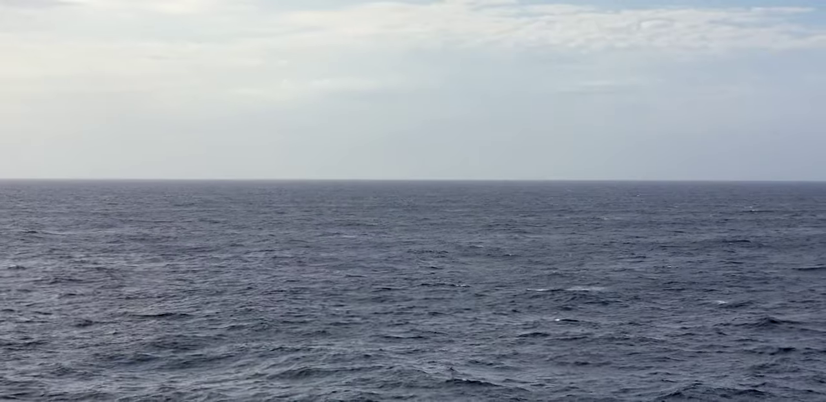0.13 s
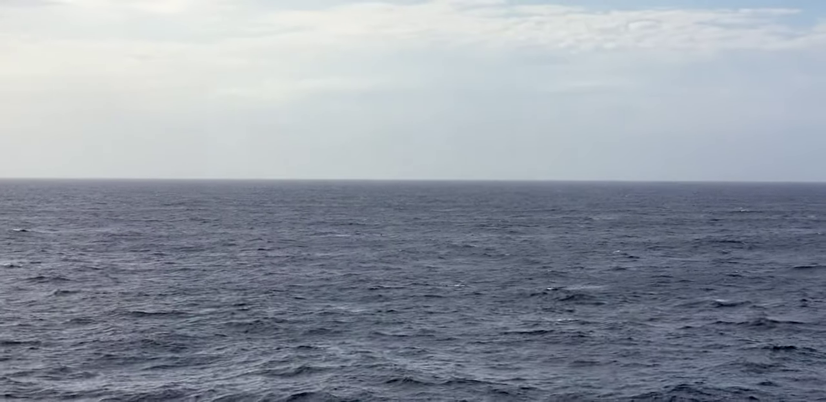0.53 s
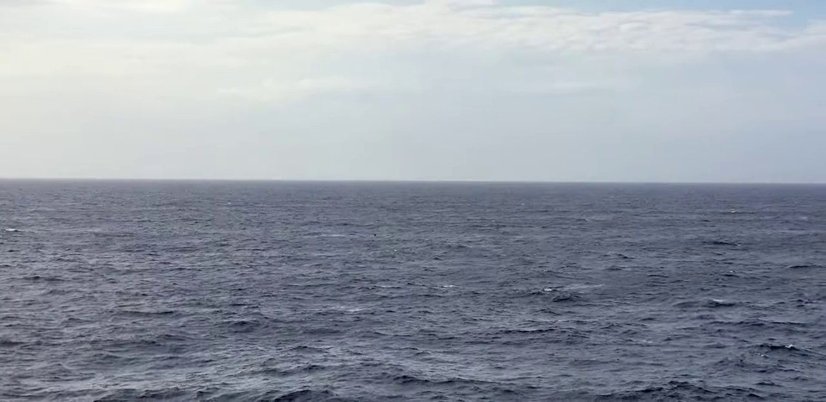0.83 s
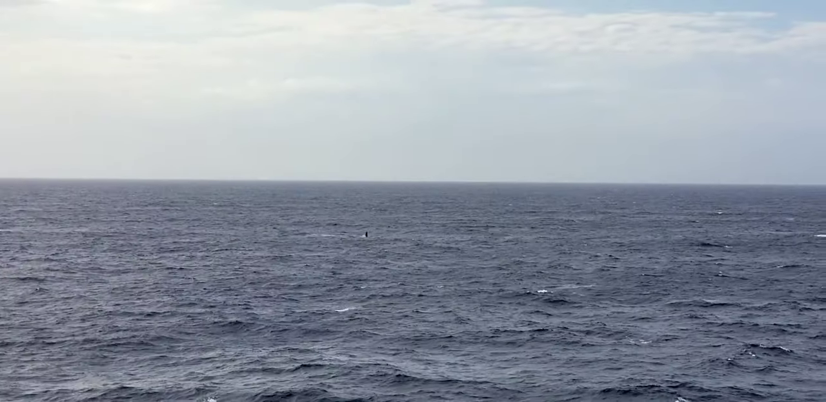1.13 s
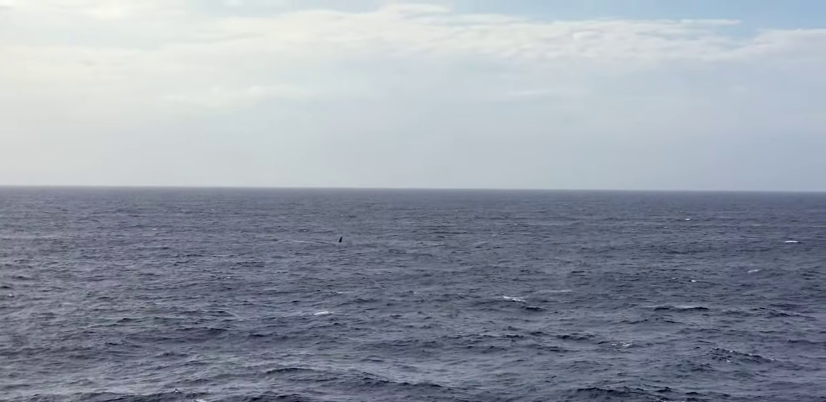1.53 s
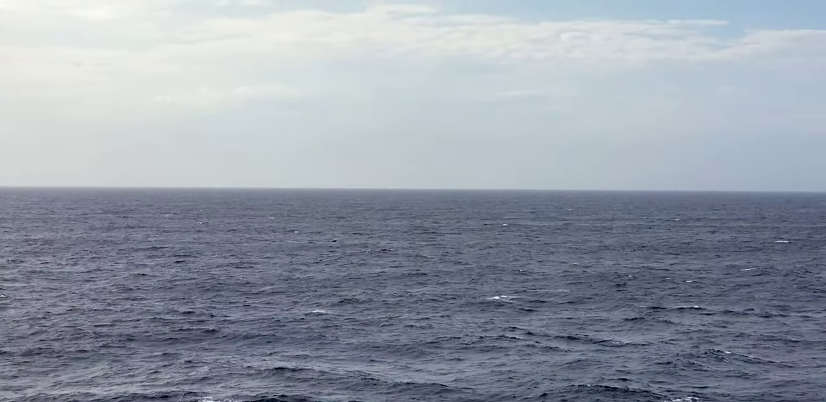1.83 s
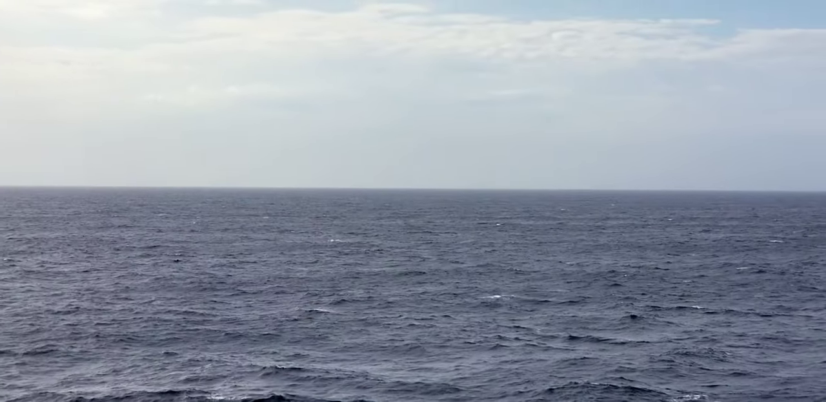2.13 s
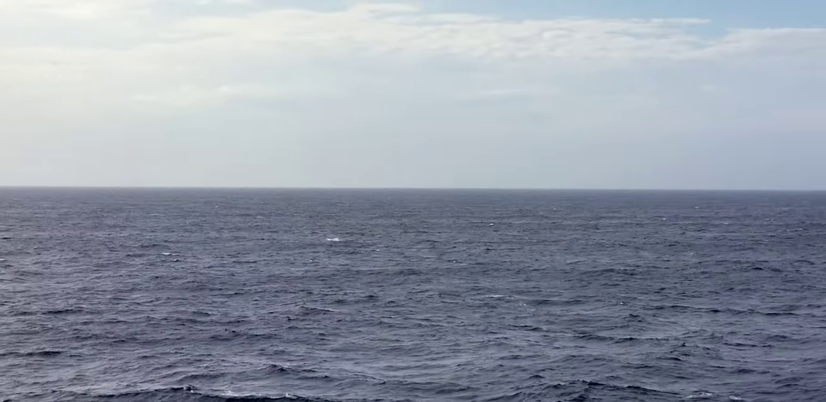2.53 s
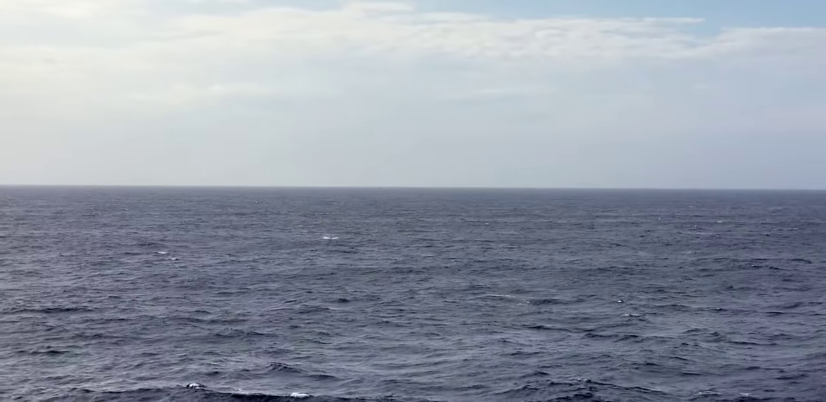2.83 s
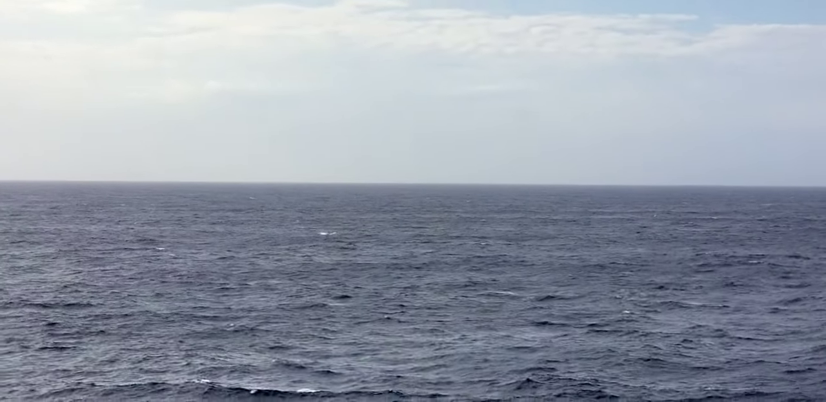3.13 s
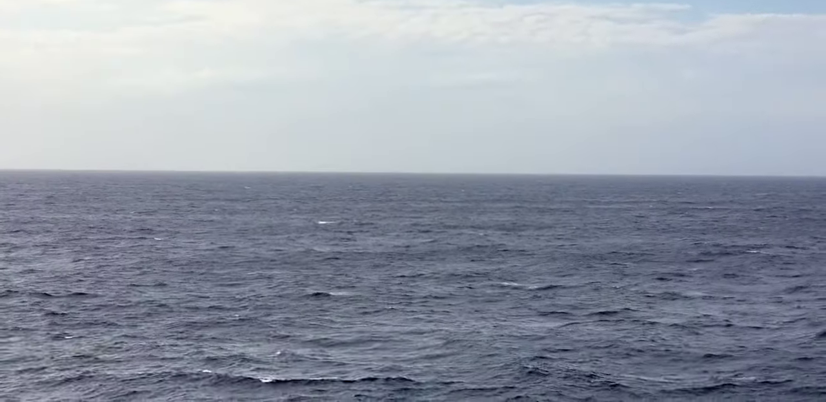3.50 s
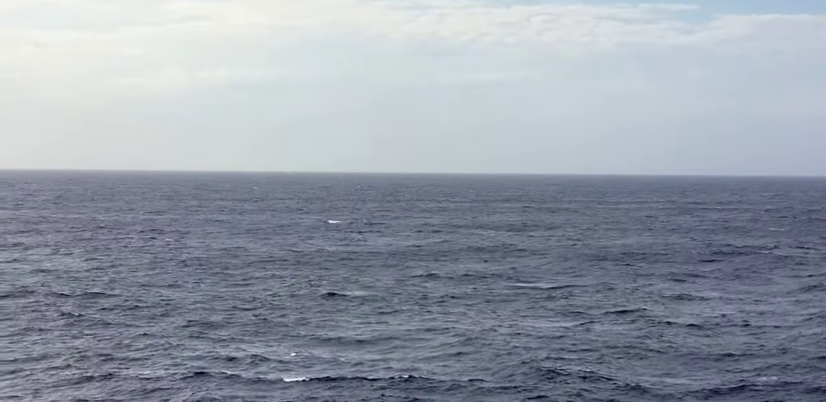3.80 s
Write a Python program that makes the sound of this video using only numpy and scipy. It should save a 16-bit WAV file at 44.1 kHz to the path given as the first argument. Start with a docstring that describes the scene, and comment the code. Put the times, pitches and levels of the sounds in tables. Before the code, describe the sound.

After a tiny silence, wind noise cuts in abruptly at 0.08 seconds: rolling rumble, raspy flutter and soft pops on the exposed right, dull thumps on both sides. It dips near 1.1, swells around 1.5-1.7, then breaks into weaker separate puffs from about 3 seconds. The sheltered left holds a low, wavering ship drone. Choppy water washes along the hull with brief foam fizz and faint steady hiss.

```python
"""Open, choppy sea heard from the deck of a moving ship on a windy day.
After a short silence all cuts in: gusts of random pressure spikes flutter at the right microphone port, over
noise shaped into a rolling rumble and rasp, with pops; thumps reach both ports. The sheltered left hears mostly
the ship's low drone (noise with narrow tones). Surging noise is water along the hull, grainy bursts are foam,
faint steady noise is hiss. The wind dips after one second, rises again, then eases into separate puffs."""
import sys
import numpy as np
from scipy import signal
from scipy.fft import rfft, irfft
from scipy.io import wavfile
from scipy.ndimage import uniform_filter1d

SR = 44100
rng = np.random.default_rng(int(sys.argv[2]) if len(sys.argv) > 2 else 0)


def int16_out(signal):
    """Quantize to a 16-bit WAV file."""
    q = np.round(np.clip(np.atleast_2d(signal).T, -1, 1) * 32767)
    wavfile.write(sys.argv[1], SR, q.astype(np.int16))


N = 174636
TIME, BINS = np.arange(N) / SR, np.fft.rfftfreq(N, 1 / SR)  # seconds, Hz
START_S, EDGE_HZ = .078, 14600  # silence before this time, little sound above this pitch

# slow rise and fall of the wind: [start_s, relative level_db]
GUSTS = [(.08, 1), (.23, 3), (.38, 2), (.58, 0.14), (.72, 0), (.94, 0), (1.06, -4), (1.25, -1.6),
         (1.38, -.5), (1.46, 2), (1.65, 3), (1.72, -.5), (1.9, 0.9), (2.04, 0.6), (2.15, 2), (2.22, -2.5),
         (2.34, 0.4), (2.48, 1), (2.66, 0.3), (2.8, -1.6), (3.02, -3), (3.3, -3.8), (3.52, -3),
         (3.66, -5.5), (3.95, -6.5)]
# single buffets and lulls of the wind: [centre_s, length_s, change_db]
BUFFETS = [(0.34, 0.022, -1), (0.561, 0.012, -10), (0.766, 0.024, 5), (.922, 0.013, 1.5),
           (1.067, 0.036, -3), (1.187, 0.043, 4), (1.437, 0.01, 3), (1.713, 0.038, -2.5), (1.877, 0.028, 5),
           (1.955, 0.02, -5), (2.14, 0.016, 1.5), (2.355, .02, 1.5), (2.388, .025, -2), (2.43, 0.02, 3.5),
           (2.514, 0.011, 2), (2.575, 0.012, -6.5), (2.762, 0.025, 3), (2.842, 0.017, -5),
           (2.887, 0.032, 4.5), (2.98, 0.017, -8.5), (3.06, 0.022, -15), (3.078, 0.0071, 12),
           (3.126, 0.018, -10), (3.245, 0.014, -15), (3.342, 0.029, 6), (3.386, 0.034, -2),
           (3.458, 0.025, -10), (3.522, 0.039, 4), (3.62, 0.019, 5.5), (3.633, 0.016, -10),
           (3.778, 0.028, -3.5), (3.812, 0.016, 5), (3.86, .025, -2), (3.912, .02, -5), (3.939, .015, 5)]
FLUTTER_DB, FLUTTER_HZ = 1.53, 40  # quick flutter when the gust level is 0 dB
FLUTTER_PER_DB = 0.22  # a slack wind comes in more separate puffs

# pressure spike of a middling eddy, before the gusts act on it: [pitch_hz, level_db_per_hz]
EDDY_SPECTRUM = [(20, -90), (50, -77.5), (85, -70.5), (140, -64.5), (270, -59), (480, -61.5), (750, -66),
                 (1100, -75.5), (1700, -87.5), (2600, -103), (6000, -126)]
EDDIES_PER_S, EDDY_SPREAD_DB = 950, 2.5  # number at a gust level of 0 dB, spread of heights
RATE_DOUBLES_DB = 3.5  # eddies crowd together as the wind rises
SIZE_SPREAD_OCT, OCT_PER_DB = .36, 0.0951  # stronger wind makes shorter, brighter spikes
SUCK_SHARE, SUCK_PER_DB = .25, 0.03  # share of eddies that suck instead of push; it grows with the wind
# change in the wind at the sheltered left port: [pitch_hz, change_db]
SHELTER = [(60, 2), (130, -8.5), (280, -9), (500, -16.5), (1100, -9)]

# rolling rumble of shed vortices, before the gusts: [pitch_hz, level_db_per_hz]
ROLL_SPECTRUM = [(60, -93), (140, -70.5), (210, -59.5), (280, -58.5), (360, -59.5), (480, -63.5),
                 (750, -76), (2000, -125)]
ROLL_LUMP_DB, ROLL_LUMP_HZ = 1.5, 17.5
# rasp of the finest turbulence at the exposed port, before the gusts: [pitch_hz, level_db_per_hz]
RASP_SPECTRUM = [(400, -110), (900, -87), (1700, -87), (2400, -95.5), (3800, -96.5), (5500, -108),
                 (8000, -125)]
RASP_LUMP_DB, RASP_LUMP_HZ = 4, 89.5
RASP_EXTRA_DB_PER_DB = .35  # the rasp grows faster than the wind itself
# the hardest single eddies, heard as soft pops: [centre_s, peak_db, spike_width_s, push 1 or suck -1]
POPS = [(0.15, -17, 0.00028, 1), (0.188, -21, 0.00014, 1), (0.2215, -20.5, 0.00011, 1),
        (.2969, -15.5, 0.00015, 1), (0.3297, -15, .0003, 1), (0.3414, -15.5, 0.00044, 1),
        (0.367, -18, 0.00032, 1), (.6868, -23, 0.00035, 1), (.707, -20, 0.00037, 1),
        (.7528, -21, 0.00027, 1), (0.891, -36, .0003, -1), (.995, -23.5, 0.00027, 1),
        (1.1083, -18.5, .0003, 1), (1.1305, -18, .0002, -1), (1.3104, -22, 0.00018, -1),
        (1.4449, -16, .0003, 1), (1.5032, -22, 0.00023, 1), (1.6231, -19, 0.00022, -1),
        (1.6606, -15, 0.00019, 1), (1.8936, -17, 0.00028, -1), (1.9113, -19, 0.00027, 1),
        (1.9324, -20, .0002, 1), (2.1132, -18.5, .0002, -1), (2.3598, -22, 0.00025, 1),
        (2.493, -29, 0.00021, -1), (2.5076, -22, .0002, 1), (2.7914, -18, 0.00033, 1),
        (2.8981, -25.5, .0003, 1), (2.9542, -23, 0.00025, 1), (3.0679, -18, 0.00028, 1),
        (3.0822, -16, 0.00019, 1), (3.1136, -19.5, 0.00027, 1), (3.1912, -20, .0003, 1),
        (3.2105, -22, 0.00028, 1), (3.2912, -20, 0.00032, 1), (3.3433, -19, 0.00034, 1),
        (3.4296, -22, 0.00034, 1), (3.527, -19, 0.00028, 1), (3.5528, -24, 0.00048, 1),
        (3.5753, -20, 0.00045, 1), (3.6711, -29, 0.00016, 1), (3.7554, -20, 0.00023, 1),
        (3.8744, -19.5, 0.00026, 1), (3.9061, -22, 0.00028, 1), (3.9455, -26, .0002, 1)]
POP_SUCTION = 5.5  # the opposite swing around a spike is this many times wider
# large eddies that reach both ports, heard as dull thumps: [centre_s, left_db, right_db]
THUMPS = [(.176, -39, -43), (.335, -44, -40), (.76, -43, -35), (.872, -40, -42), (1.2, -35.5, -42),
          (1.575, -56, -37), (1.606, -38, -42), (1.876, -37, -38), (2.125, -33.5, -32), (2.28, -42, -39),
          (2.425, -39, -42), (2.631, -41, -33), (3.075, -53, -42), (3.344, -42, -37), (3.522, -52, -32),
          (3.712, -37.5, -36), (3.81, -46, -38), (3.94, -41, -40)]
THUMP_S, THUMP_HZ, THUMP_WIDTH_OCT = 0.026, 155, 0.52

# water along the hull, before surges and port levels: [pitch_hz, level_db_per_hz]
WASH_SPECTRUM = [(100, -81.5), (400, -73.5), (750, -71.5), (1200, -78), (1800, -80), (2300, -87.5),
                 (3000, -88.5), (3900, -92.5), (5000, -99.5), (6000, -110), (7500, -130), (14000, -145)]
# level of the water at each port: [left_db, right_db]
WASH_PORT_DB = [-0.5, -1.77]
# surges of the wash: [start_s, change_db]
SURGES = [(.08, -1.5), (.33, 3.5), (.56, -1.5), (.69, 0.1), (1, 0.8), (1.35, .1), (1.5, 1.5), (1.69, 1.5),
          (1.8, -0.5), (1.95, 0), (2.14, -0.5), (2.26, -2.5), (2.42, 0), (2.7, 0), (2.95, -1.8), (3.16, 0),
          (3.41, -1.5), (3.53, 0), (3.75, -1), (3.95, -1.5)]
# how alike the two ports hear the water: [pitch_hz, likeness 0-1, left_lead_radians]
WASH_PAIR = [(100, 0, 31), (900, 0.17, 2.5), (1640, 0.06, 1.56), (2200, 0.3, -2.5), (4100, 0.4, -1.5),
             (6000, 0, -5)]
PATCH_DB, PATCH_S, PATCH_HZ = 1.15, .08, 1100  # broad patches where crests collapse
SPLASH_DB, SPLASH_S, SPLASH_HZ = 1.86, .03, 600  # small splashes make the wash flutter

# foam fizzing after a crest breaks: [centre_s, length_s, left_db_per_hz, right_db_per_hz]
FOAM_SWELLS = [(.31, 0.086, -88, -87), (0.543, 0.11, -88, -87), (0.917, 0.14, -97, -94),
               (1.683, .07, -92, -91), (2.43, 0.044, -96, -90), (3.14, 0.18, -95, -88.5),
               (3.53, .06, -94, -88), (3.726, 0.16, -95, -89.5)]
# middle pitches of the three bubble sizes: [pitch_hz]
BUBBLE_HZ = [2550, 3100, 3700]
FOAM_WIDTH_OCT = .12
BUBBLES_PER_S, BUBBLE_SPREAD_DB = 5600, 4.5  # number for each size and port
CLUMP_DB, CLUMP_HZ = 2.8, 18  # bubbles of each size burst in their own clumps

# broad roar of the ship, before port levels: [pitch_hz, level_db_per_hz]
ROAR_SPECTRUM = [(15, -94), (26, -96), (45, -70), (90, -70), (170, -74), (300, -63), (420, -67.5),
                 (520, -72), (900, -80.5), (2000, -125), (5000, -125)]
# level of the roar at each port: [left_db, right_db]
ROAR_PORT_DB = [-1.5, -6.5]
# machinery tones, before port levels: [pitch_hz, width_hz, level_db]
DRONE_TONES = [(35.8, 2.5, -55), (149.9, 1.9, -54), (193.8, 2.8, -50.5), (365, 6.3, -54.5),
               (419.5, 17, -52), (576, 7.6, -52), (877, 5.4, -65)]
# level of the tones at each port: [left_db, right_db]
DRONE_PORT_DB = [-1, -6.5]
MONO_BELOW_HZ, BASS_LIKENESS = 66, 0.97  # the deepest drone reaches both ports nearly alike

# microphone hiss: [pitch_hz, left_db_per_hz, right_db_per_hz]
HISS_SPECTRUM = [(1000, -120, -124), (3800, -120, -96), (5730, -122, -98), (6870, -125, -102),
                 (8350, -128, -103.5), (9500, -109, -99), (10960, -101, -97.5), (12400, -106, -101.5),
                 (13900, -118, -99)]


def wind():
    """Wind is a dull rumble on the left, flutter, roll, rasp and pops on the right, and thumps on both."""
    left = rfft(eddies()) * amp(at_hz(SHELTER, BINS))
    right = rfft(eddies() + roll() + rasp() + pops())
    pressure_leak = BINS ** 2 / (BINS ** 2 + 10 ** 2)  # steady pressure leaks away
    return irfft(np.array([left, right]) * pressure_leak, N) + thumps()


def eddies(count=7):
    """Each passing eddy is a pressure spike; small ones are short and bright."""
    strength_db = at_time(GUSTS, TIME)
    rate = EDDIES_PER_S * 2 ** (strength_db / RATE_DOUBLES_DB)
    spread_db = EDDY_SPREAD_DB * np.clip(rng.standard_normal(N), -2, 2)
    heights = amp(spread_db) / np.sqrt(rate)  # crowding alone adds no power
    sign = np.where(rng.random(N) < SUCK_SHARE + SUCK_PER_DB * strength_db, -1, 1)
    arrives = rng.random(N) < rate / SR
    spikes = unit(arrives * sign * heights) * wind_gain()

    # sort the spikes into a few sizes, each with its own shifted spectrum
    octave = OCT_PER_DB * strength_db + SIZE_SPREAD_OCT * rng.standard_normal(N)
    sizes = np.linspace(-1, 1, count)
    nearest = abs(octave[:, None] - sizes).argmin(axis=1)
    out = np.zeros(N)
    for k, size in enumerate(sizes):
        spectrum_db = at_hz(EDDY_SPECTRUM, BINS / 2 ** size)
        out += colour(spikes * (nearest == k), spectrum_db) / np.sqrt(2 ** size)
    return out


def wind_gain():
    """The force of the wind combines slow gusts, single buffets and a fresh random flutter."""
    strength_db = at_time(GUSTS, TIME)
    buffet_db = sum(db * bell(s, length) for s, length, db in BUFFETS)
    flutter_db = (FLUTTER_DB - FLUTTER_PER_DB * strength_db) * wander(FLUTTER_HZ)
    return amp(strength_db + buffet_db + flutter_db)


def roll():
    """Shed vortices make a hollow rumble that comes in soft lumps under the spikes."""
    lumpy = rng.standard_normal(N) * lumps(ROLL_LUMP_DB, ROLL_LUMP_HZ)
    return colour(lumpy * wind_gain(), at_hz(ROLL_SPECTRUM, BINS))


def rasp():
    """Fine turbulence tears at the port in short, bright bursts that follow the gusts."""
    force = wind_gain() * amp(RASP_EXTRA_DB_PER_DB * at_time(GUSTS, TIME))
    lumpy = rng.standard_normal(N) * lumps(RASP_LUMP_DB, RASP_LUMP_HZ)
    return colour(lumpy * force, at_hz(RASP_SPECTRUM, BINS))


def pops():
    """A hard eddy briefly pushes or pulls the diaphragm, with a gentler opposite swing before and after."""
    out = np.zeros(N)
    for s, db, width, way in POPS:
        near = abs(TIME - s) < .01
        u = (TIME[near] - s) / width
        spike = np.exp(-.5 * u ** 2)
        opposite = np.exp(-.5 * (u / POP_SUCTION) ** 2) / POP_SUCTION
        shape = spike - opposite
        out[near] += np.sign(way) * amp(db) * shape / shape.max()
    return out


def thumps():
    """A large eddy shakes both ports with a brief swell of low rumble."""
    rumble = colour(rng.standard_normal((2, N)), hump(THUMP_HZ, THUMP_WIDTH_OCT))
    out = np.zeros((2, N))
    for s, *port_db in THUMPS:
        near = abs(TIME - s) < 2 * THUMP_S
        swell = bell(s, THUMP_S)[near]
        for port, db in enumerate(port_db):
            thump = unit(rumble[port, near] * swell) * np.sqrt(np.mean(swell ** 2))
            out[port, near] += amp(db) * thump
    return out


def sea(size=512):
    """Foaming water is a surging wash, with broad patches where crests collapse and quick small splashes."""
    wash = colour(rng.standard_normal((2, N)), at_hz(WASH_SPECTRUM, BINS))
    hz, t, (left, other) = signal.stft(wash, SR, nperseg=size)
    # the right port hears a delayed share of the left, filled up with its own water
    same = np.clip(at_hz(WASH_PAIR, hz), 0, 1)[:, None]
    lead = at_hz(WASH_PAIR, hz, axis=2)[:, None]
    right = same * np.exp(-1j * lead) * left + np.sqrt(1 - same ** 2) * other
    patch_db = PATCH_DB * patches(hz, t, PATCH_HZ, PATCH_S)
    splash_db = SPLASH_DB * patches(hz, t, SPLASH_HZ, SPLASH_S)
    level_db = at_time(SURGES, t) + patch_db + splash_db
    water = signal.istft(np.array([left, right]) * amp(level_db), SR, nperseg=size)[1][:, :N]
    return amp(WASH_PORT_DB)[:, None] * water


def patches(hz, t, width_hz, length_s):
    """Random blotches of rms 1 spread over frequency and time."""
    rows, columns = max(1, round(width_hz / hz[1])), max(1, round(length_s / t[1]))
    field = uniform_filter1d(rng.standard_normal((len(hz), len(t))), rows, axis=0)
    return unit(uniform_filter1d(field, columns, axis=1))


def foam():
    """Clumps of small bursting bubbles in three sizes make swells of grainy fizz."""
    fizz = np.zeros((2, N))
    for hz in BUBBLE_HZ:
        arrives = rng.random((2, N)) < BUBBLES_PER_S / SR
        sign = rng.choice([-1, 1], (2, N))
        heights = amp(BUBBLE_SPREAD_DB * rng.standard_normal((2, N)))
        clumped = unit(arrives * sign * heights * lumps(CLUMP_DB, CLUMP_HZ))
        fizz += colour(clumped, hump(hz, FOAM_WIDTH_OCT))
    swells = sum(amp(port_db)[:, None] * bell(s, length) for s, length, *port_db in FOAM_SWELLS)
    return fizz * swells


def ship():
    """Wavering tones of engines and fans, made of narrow noise, stand out of a steady roar."""
    roar = colour(deck_noise(), at_hz(ROAR_SPECTRUM, BINS))
    noise = rfft(deck_noise())
    tones = np.zeros((2, N))
    for hz, width, db in DRONE_TONES:
        resonance = 1 / (1 + ((BINS - hz) / width) ** 2)
        tones += amp(db) * unit(irfft(noise * resonance, N))
    return amp(ROAR_PORT_DB)[:, None] * roar + amp(DRONE_PORT_DB)[:, None] * tones


def deck_noise():
    """Flat noise reaches the two ports alike in the deep bass and ever less alike above."""
    left, other = rfft(rng.standard_normal((2, N)))
    same = np.clip(BASS_LIKENESS, 0, 1) / np.sqrt(1 + (BINS / MONO_BELOW_HZ) ** 4)
    right = same * left + np.sqrt(1 - same ** 2) * other
    return irfft(np.array([left, right]), N)


def hiss():
    """The two microphones make steady, unrelated noise of their own, stronger on the right over most pitches."""
    density_db = np.array([at_hz(HISS_SPECTRUM, BINS, axis=port) for port in (1, 2)])
    return colour(rng.standard_normal((2, N)), density_db)


def amp(db):
    """Turns decibels into gain."""
    return 10 ** (np.asarray(db) / 20)


def unit(x):
    """Scales to an rms (average strength) of 1."""
    return x / np.sqrt(np.mean(x ** 2) + 1e-20)


def at_hz(table, hz, axis=1):
    """Reads one column of a spectrum table on a log-frequency axis."""
    table = np.array(table)
    return np.interp(np.log(hz + 1), np.log(table[:, 0] + 1), table[:, axis])


def at_time(curve, t):
    """Reads a curve of values over time."""
    return np.interp(t, *np.transpose(curve))


def colour(white, density_db):
    """Gives a flat signal of rms 1 a spectrum in dB per Hz, without shifting it in time."""
    return irfft(rfft(white) * amp(density_db) * np.sqrt(SR / 2), N)


def wander(rate_hz):
    """Random movement of rms 1, mostly slower than the given rate."""
    no_drift = BINS / (BINS + rate_hz / 10)
    smooth = 1 + (BINS / rate_hz) ** 2
    return unit(irfft(rfft(rng.standard_normal(N)) * no_drift / smooth, N))


def lumps(depth_db, rate_hz):
    """An uneven gain of rms 1."""
    return unit(amp(depth_db * wander(rate_hz)))


def bell(centre_s, length_s):
    """A smooth rise and fall that peaks at 1."""
    return np.exp(-2 * ((TIME - centre_s) / length_s) ** 2)


def hump(centre_hz, width_oct):
    """A rounded band in dB, 3 dB down at the given distance from its centre."""
    return -3 * (np.log2((BINS + 1) / centre_hz) / width_oct) ** 2


def scene():
    """Wind, ship, sea, foam and hiss sound together."""
    return wind() + ship() + sea() + foam() + hiss()


def record(dry):
    """The sound cuts in after the silence, then a low-pass filter removes the highest treble."""
    taps = signal.firwin(511, EDGE_HZ, window=("kaiser", 9), fs=SR)
    return signal.oaconvolve(dry * (TIME >= START_S), taps[None], "same")


dry = scene()
out = record(dry)
int16_out(out)
```